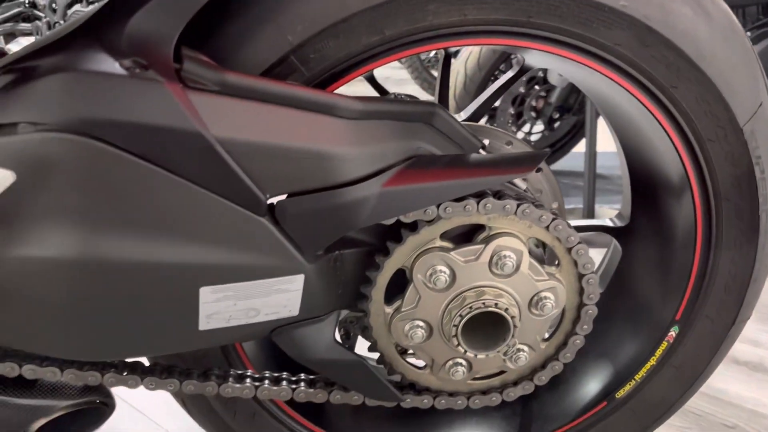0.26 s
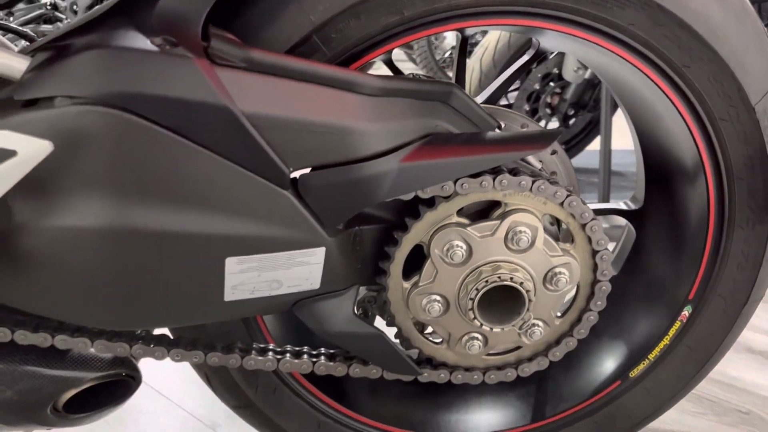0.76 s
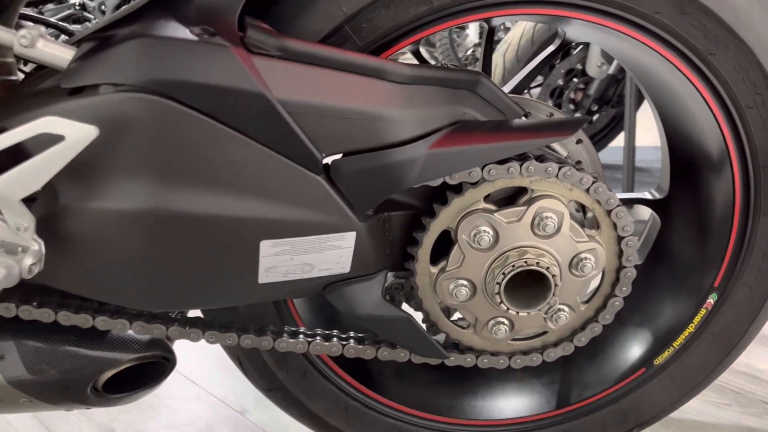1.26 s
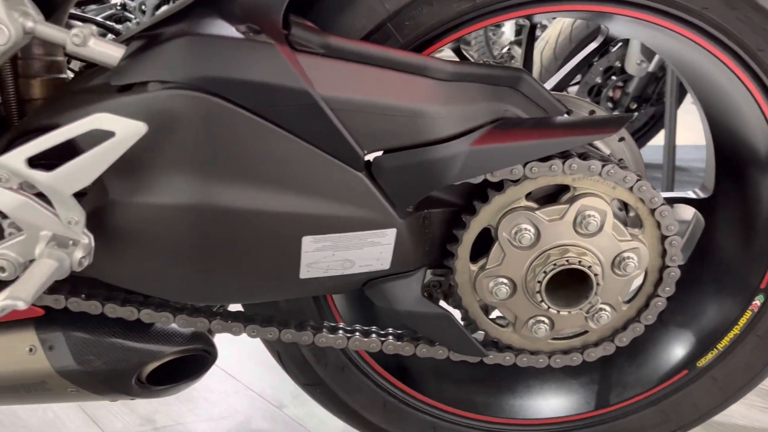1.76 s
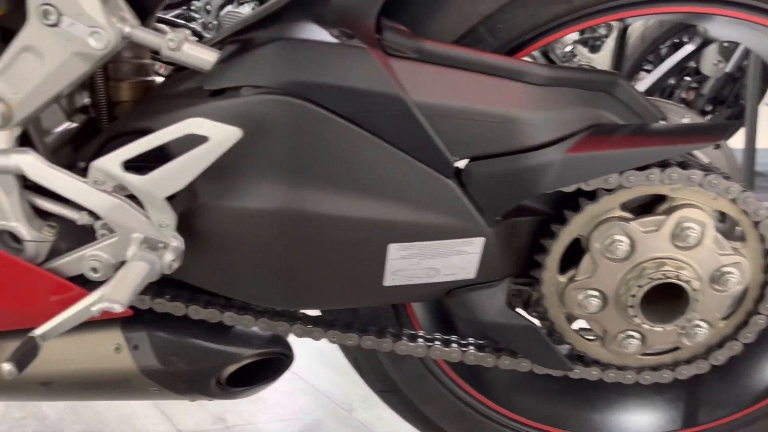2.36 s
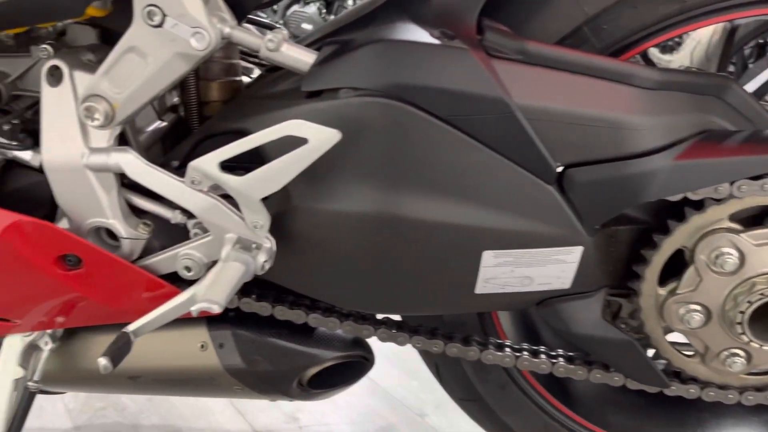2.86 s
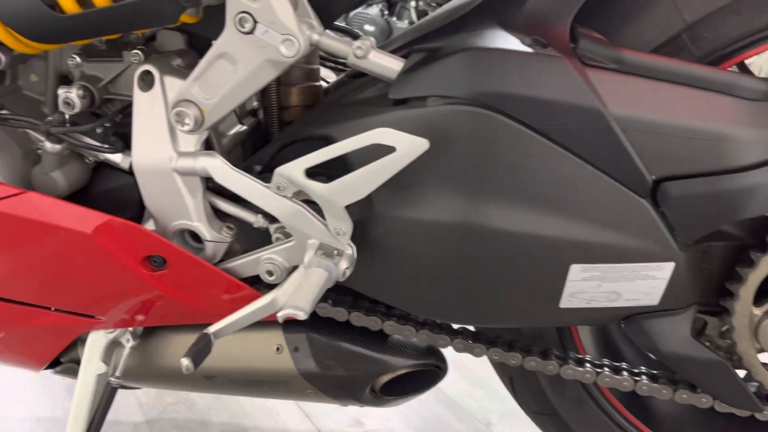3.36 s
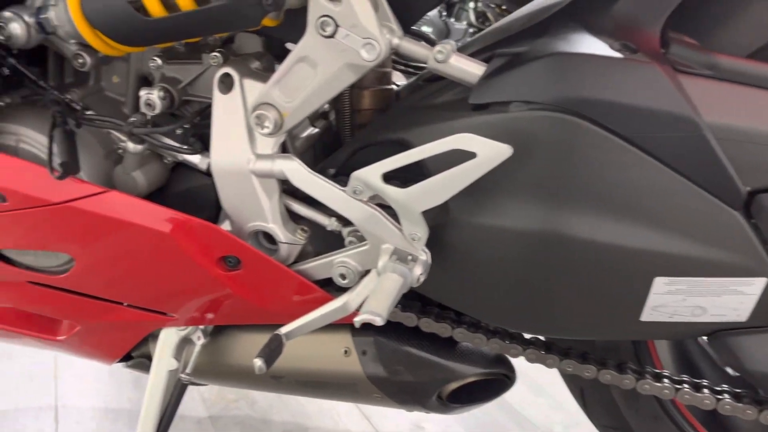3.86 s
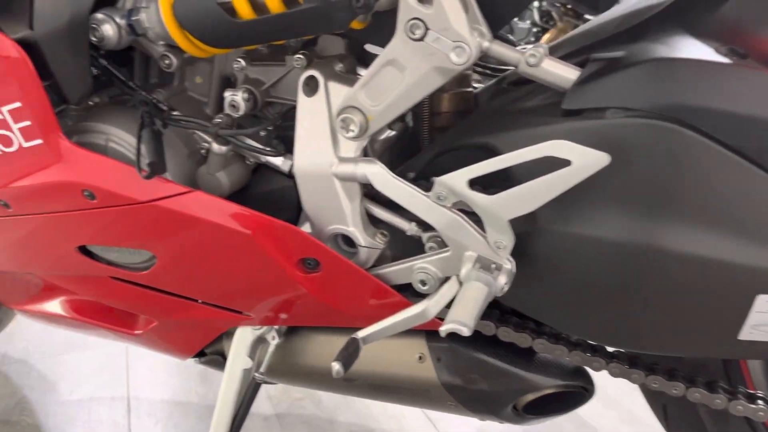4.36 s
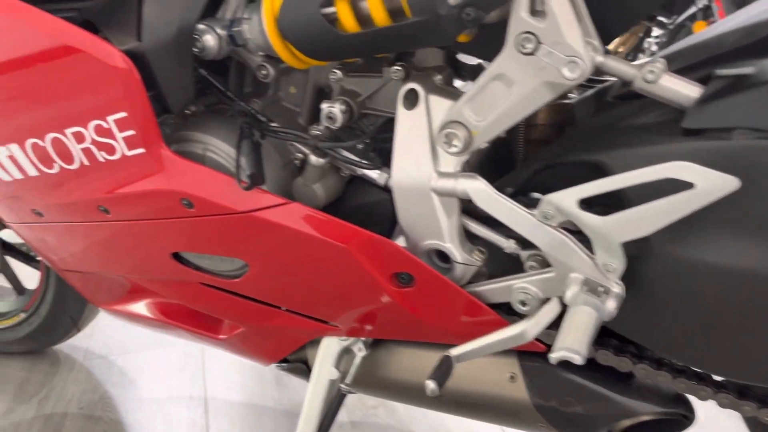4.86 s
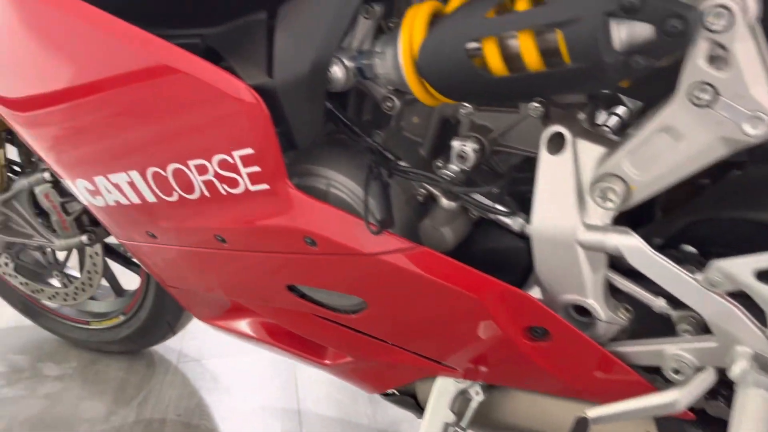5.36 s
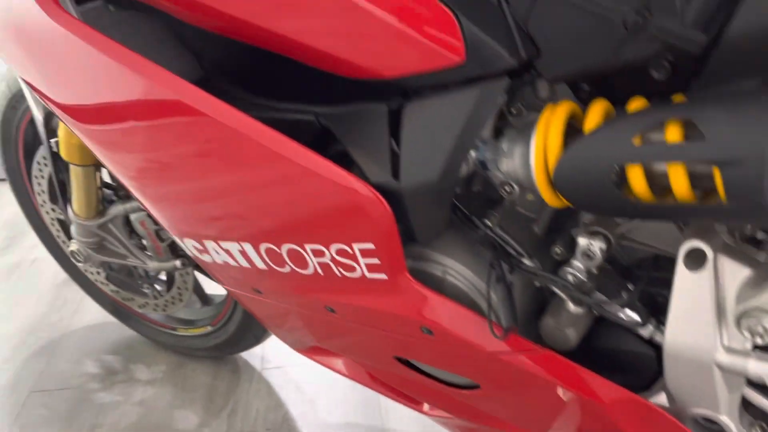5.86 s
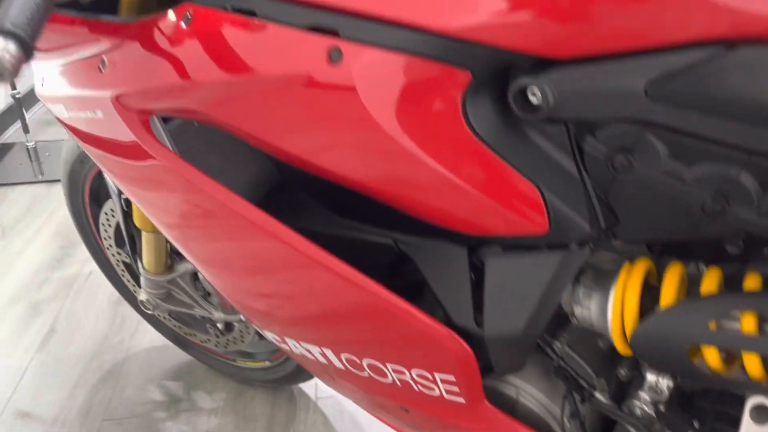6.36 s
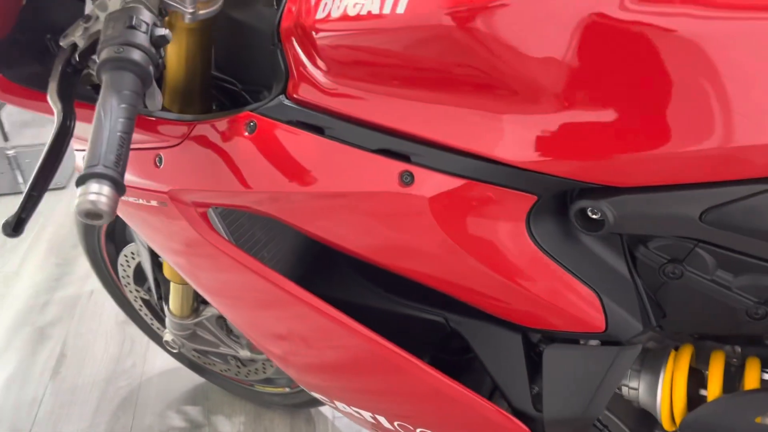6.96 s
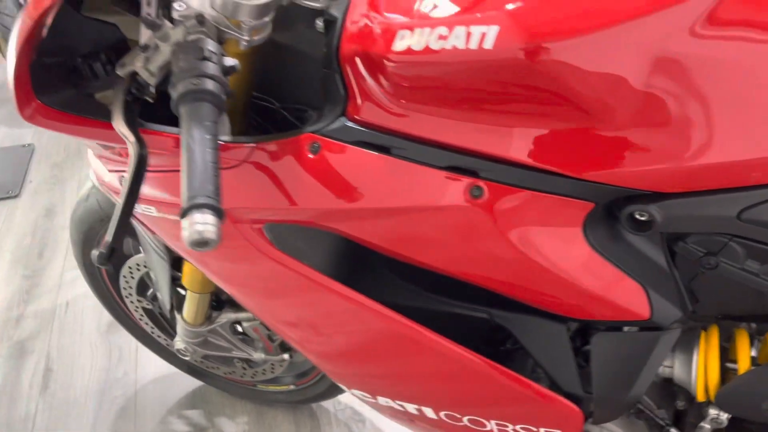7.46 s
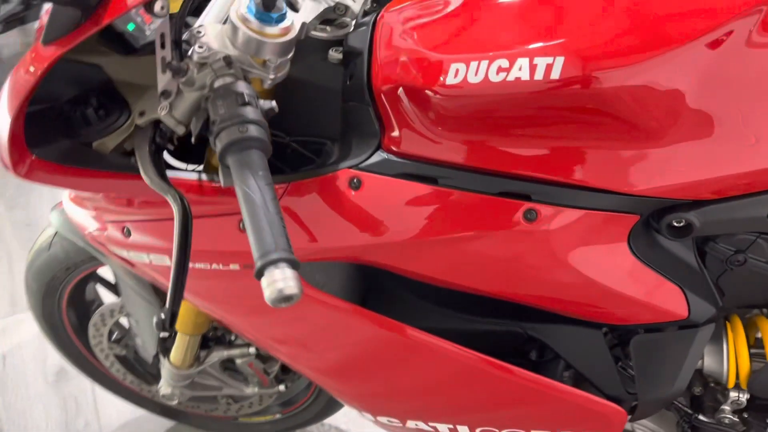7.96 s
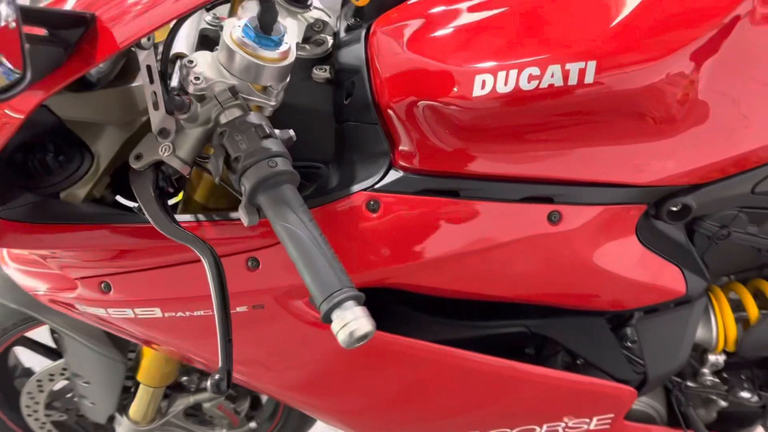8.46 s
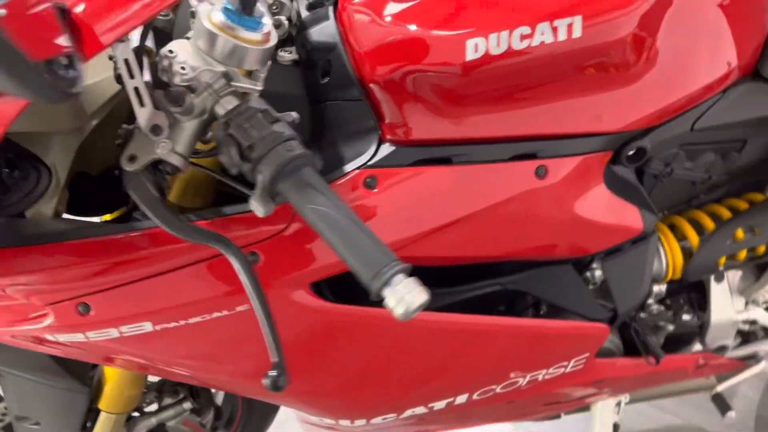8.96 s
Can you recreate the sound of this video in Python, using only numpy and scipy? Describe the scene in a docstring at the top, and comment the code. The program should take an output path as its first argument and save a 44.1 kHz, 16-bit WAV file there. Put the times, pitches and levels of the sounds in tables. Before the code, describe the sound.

Close, loud and bassy motorcycle idle, running throughout without revving. One cylinder fires steadily while the other catches irregularly, making a loping, stumbling beat. Case knocks and light valve ticks sit in continuous mechanical rattle. As the phone microphone travels forward along the machine, exhaust bark and rear beats weaken, the pulse slows slightly, and hall reverberation increases around it.

```python
"""Hard-floored hall: a big two-cylinder motorcycle idles unevenly; a phone moves from exhaust to bars.
Front cylinder fires almost every cycle, rear often misses; each gas puff rings exhaust modes and rasps.
Valve gear: noise swells at knocks and ticks over a clatter bed; knocks also ring the cases.
A deep tone follows the crank, uneven low noise rumbles, and the hall answers the exhaust."""
import sys
import numpy as np
from scipy import signal
from scipy.io import wavfile
from scipy.ndimage import uniform_filter1d

SR = 44100
rng = np.random.default_rng(int(sys.argv[2]) if len(sys.argv) > 2 else 0)


def dump_mix(stems):
    """Bounce the given channels to the path in sys.argv[1] as a 16-bit WAV at rate SR."""
    frames = np.atleast_2d(stems).T  # one column per channel
    limited = np.clip(frames, -1, 1)  # hard clip at full scale
    pcm = np.round(limited * 32767).astype(np.int16)
    wavfile.write(sys.argv[1], SR, pcm)


N = 406161
TIME_S = np.arange(N) / SR
LEAD_SAMPLES = SR // 10

# Idle hunts and slows: [time_s, engine_cycles_done]
CRANK = [(-0.0268, 0), (0.1048, 2), (0.1742, 3), (0.3637, 6), (0.7659, 12), (1.145, 18), (1.9886, 31),
         (2.7429, 42), (3.2802, 50), (3.7638, 57), (4.1039, 62), (4.2500, 64), (4.4592, 67), (4.8304, 72),
         (5.378, 80), (5.526, 82), (5.7244, 85), (5.9309, 88), (6.0626, 90), (6.4065, 95), (7.0438, 104),
         (7.183, 106), (7.2582, 107), (7.3907, 109), (7.8849, 116), (8.3875, 123), (8.4643, 124),
         (9.1678, 134), (9.238, 135)]
# Path from exhaust to bars: [time_s, share_of_way]
WALK = [(5, 0.18), (8, 0.92)]
# Front cylinder: [time_s, boom_rel_db, bark_rel_db]
FRONT = [(0, 2, 1), (1.7, 3.5, -0.5), (2.6, 1.5, 2.5), (3.8, 2, 1), (4.7, 0.5, 1.5), (5.8, 0, 1.5),
         (6.4, -2.5, -2.5), (7, -1.5, -5), (7.7, -2, -8.5), (8.3, -2, -9), (8.75, -7, -4.5), (8.9, -2, 0),
         (9.2, -6.5, -1.5)]
# Front firings that stray from the trend, mostly weaker, many just after a rear one:
# [time_s, boom_change_db, bark_change_db]
STRAY = [(-0.03, 3.5, -31), (0.04, -21, -3), (0.17, -4, -32), (0.76, -20, -3), (0.89, -18, -3.5),
         (1.01, -6, -3), (1.15, -17, -10), (1.28, -1, -6.5), (1.41, -4, -29), (1.54, -3.5, -8),
         (1.67, -5, -31), (1.8, -2.5, -8), (1.92, -8, -1), (2.06, -9.5, -31), (2.33, -9, -27),
         (2.47, -22, -5.5), (2.61, -5, -2), (2.74, -1, -32), (3.21, -8, 2.5), (3.63, -9, -1),
         (3.76, -0.5, -11), (3.83, -2, 1.5), (4.18, -1.5, 0), (5.17, -2.5, 3.5), (5.45, -3, 3.5),
         (5.79, -5, 4.5), (6.0, -1, 2.5), (6.2, -26, 2.5), (6.34, -8, -4), (6.41, -1, -1), (6.9, -5, -13),
         (6.97, -1, -5), (7.26, -1, -7), (8.39, -5, -5), (8.53, -9, -4), (8.67, -6, -7), (8.81, -24, -13),
         (8.96, -5, -4)]
# Rear cylinder catches: [time_s, level_rel_db]
REAR = [(0.013, 3), (0.1426, 3.5), (0.2119, -3.5), (0.2772, -11), (0.339, -4), (0.4719, 1.5), (0.6051, 3),
        (0.7413, 1.5), (0.8689, 1.5), (0.9892, 4.5), (1.1193, 2.5), (1.2494, 2), (1.3803, 4.5),
        (1.4434, -6), (1.5075, 0.5), (1.6409, 3), (1.768, 2.5), (1.8992, -0.5), (2.0364, -2.2),
        (2.1743, -1.5), (2.3078, 1), (2.4334, 1), (2.581, 2.5), (2.7183, 2), (2.7835, -5), (2.851, -1),
        (2.9177, -3.5), (3.0567, -2), (3.1876, 2.0), (3.256, -10.0), (3.325, 0.5), (3.4608, 0.5),
        (3.6045, 1), (3.735, -16), (3.8131, 2.5), (4.0111, 0.3), (4.2216, 2), (4.3622, 0), (4.6535, -15),
        (4.7265, -23), (4.8005, 0.5), (4.9404, 3), (5.0084, -6.5), (5.1494, -1.5), (5.3588, -2), (5.568, 1),
        (5.7674, 2.5), (5.9717, 0), (6.0968, -10), (6.18, -1.5), (6.3797, -3), (6.5952, -6.5),
        (6.7334, -16), (7.0181, -9.5), (7.1575, -6.5), (7.4341, -10), (7.6503, -11), (7.7823, -14),
        (7.9295, -11.5), (8.2882, -10.5), (8.4372, -15.0), (8.5028, -12), (8.8595, -10.5), (8.9977, -9.5),
        (9.0683, -12), (9.1417, -23)]
# Front firing that follows a rear one: [boom_change_db, bark_change_db]
AFTER_REAR_DB = (-.5, 1)
# Exhaust modes: [pitch_hz, t60_s, front_header_gain, rear_header_gain, change_at_bars_db]
PIPE = [(49.6, 0.42, 0.1039, 0.14, 5), (57.1, 0.096, 0.13, -0.97, -17), (72.3, 0.036, -1.6, -0.2, -6),
        (119.8, 0.13, 2, 0.37, -10), (133.5, 0.16, 2.5, 3, 1.5), (136.96, 0.13, -3.5, -2.5, -0.04),
        (168, 0.29, 0.195, 0.19, 1), (239.8, 0.045, -0.54, -2, 8), (292.2, 0.042, -4.5, 3.5, 5.0),
        (289.7, 0.075, 3, 0.97, 6.5), (303, 0.092, 1.79, -1.44, 3), (363.4, 0.062, 0.73, -0.2, 2.5),
        (414, 0.078, 0.15, -0.6, -7), (503, 0.0075, -0.6, -1.3, 0.5)]
# Puff rise time: [front_header_s, rear_header_s]
PUFF_RISE_S = (.0017, .0017)
# Gas rush at the outlet: [freq_hz, density_rel_db_per_hz]
RASP = [(200, -45), (330, 0.5), (420, 0), (470, -6.5), (560, -9), (750, -18), (1200, -56)]
# Rush dulls away from the outlet: [time_s, level_rel_db, change_above_450hz_db]
RASP_HEARD = [(0, -23.5, -4), (1, -24.5, -2), (2, -25, 1), (3, -27.5, -15), (4.5, -27, -19),
              (6, -33.5, -11.5), (7, -19.5, -9.5), (8, -19.5, -7), (9.21, -27.5, -11)]
# Third order of the engine cycle, wandering: [time_s, level_rel_db]
THROB = [(0, -11), (.3, -26), (.95, -20), (1.7, -18.5), (2.15, -22), (2.7, -20), (3.2, -19), (4.5, -28),
         (5.25, -22), (5.9, -35), (6.1, -23), (7.5, -34), (8.1, -26), (8.8, -17.5), (9.1, -22)]
# Bed levels and stereo: [time_s, clatter_rel_db, fizz_rel_db, rumble_rel_db,
# boom_left_over_right_db, bark_left_over_right_db]
BED = [(0, -33, -59.5, -21, 0, 10), (1.5, -34, -60.5, -19.5, 0.5, 8), (3.3, -35, -60.5, -23, -0.5, 6.5),
       (4.6, -35.5, -62.5, -21.5, 1.5, 4), (5.7, -35.5, -61, -24, -2, 2.5), (6.1, -35.5, -60, -26, -0.5, 2),
       (6.8, -37.5, -62, -22.5, -1, 0), (7.9, -38, -62.5, -27.5, -2.5, 6.5),
       (8.6, -38.5, -63.5, -27.5, 1, 4.5), (9.21, -38.5, -64, -25.5, 0, 2)]
# Clatter near the exhaust, sum of the ports: [freq_hz, density_rel_db_per_hz]
CLATTER_EXHAUST = [(280, -31), (480, -7.5), (805, -4.5), (890, -10.5), (1600, -10), (2610, -8), (3530, -13),
                   (4190, -12.5), (5660, -19.5), (7230, -27.5), (8220, -45.5), (9360, -27.5), (11900, -25),
                   (13800, -31.5), (14800, -43.5)]
# Clatter near the bars: [freq_hz, density_rel_db_per_hz]
CLATTER_BARS = [(330, -31), (560, -3.5), (688, -3.5), (956, 0.5), (1590, -6.5), (1770, -3), (1920, -5.5),
                (2980, -7), (7460, -26.5), (8440, -54), (9290, -31.5), (12600, -26), (13800, -40.5),
                (14800, -54)]
# Clatter rings that shift as the phone moves: [time_s, low_hz, low_lift_db, mid_hz, mid_lift_db,
# high_hz, high_lift_db]
RINGS = [(0, 750, 1.2, 1890, 3.2, 2660, 4.4), (2.5, 750, 4.4, 1890, 3.2, 2570, 1.6),
         (4.7, 715, 7.5, 1900, 5, 2560, 0.5), (5.9, 780, 4.9, 1940, 3.7, 2550, 1.3),
         (6.3, 820, 1.1, 1780, 9.9, 2470, 1.3), (7, 824, 4.3, 1810, 6.3, 2600, 1.4),
         (8.3, 833, 1.9, 1770, 3.3, 2560, 1.3), (9.21, 846, 4.5, 1805, 8, 2530, 1.8)]
# Gaussian widths of those rings: [low_hz, mid_hz, high_hz]
RING_WIDTHS_HZ = (35, 79, 200)
# Struck cases: [pitch_hz, level_re_knock_db, t60_s]
CASES = [(750, -3.5, 0.02), (1013, -10, .04), (1207, -3, 0.033), (1763, -10.5, 0.13), (2010, -3.5, 0.054),
         (2560, -4, 0.023), (3310, -13.5, 0.024), (4320, -15, 0.012)]
# Louder knocks: [time_s, peak_rel_db]
LOUD_KNOCKS = [(0.0253, -23), (0.0932, -21.5), (0.1356, -27), (0.2269, -25), (1.8467, -28), (1.9799, -27),
               (2.3865, -24), (2.5277, -24.5), (2.6628, -25), (2.7282, -27), (2.7995, -25), (2.9337, -24.5),
               (3.0694, -25), (3.2006, -25), (3.3373, -24), (3.4042, -26), (3.4765, -26), (3.6127, -24.5),
               (3.682, -23), (3.9559, -24.5), (4.0228, -23.5), (4.377, -26.5), (4.4463, -25), (4.5196, -26),
               (4.6703, -25.5), (4.7411, -27.5), (4.8189, -25.5), (4.8853, -27), (4.9546, -23.5),
               (5.026, -26), (5.1622, -24), (5.2979, -28), (5.5807, -24), (5.7813, -25.5), (5.8476, -25),
               (5.9189, -31), (5.9858, -22), (6.118, -28.5), (6.2562, -28), (6.3959, -24.5),
               (6.8154, -26.5), (6.9581, -25.5), (7.0973, -27), (7.444, -26), (7.5877, -30), (8.4482, -28),
               (8.5949, -26.5), (8.7301, -29), (9.0838, -28), (9.1551, -27)]
# Louder ticks: [time_s, peak_rel_db]
LOUD_TICKS = [(0.1027, -41), (0.2982, -41), (0.3636, -39), (0.4284, -44), (0.4958, -40), (0.5616, -34),
              (0.63, -40), (0.6958, -36), (0.8255, -41), (0.9537, -38), (1.0201, -40), (1.0774, -41),
              (1.2096, -40), (1.3394, -37), (1.726, -35), (1.9889, -40), (2.1241, -43), (2.1929, -39),
              (2.2613, -40), (2.3271, -41), (2.394, -43), (2.604, -39), (2.808, -39), (2.8739, -45),
              (2.9412, -42), (3.0779, -39), (3.1428, -41), (3.2101, -38), (3.277, -45), (3.3473, -41),
              (3.5568, -40), (3.6237, -39), (3.8337, -39), (3.897, -41), (4.0332, -40), (4.1754, -42),
              (4.3874, -44), (4.5306, -44), (4.7531, -48), (4.8259, -43), (4.9656, -43), (5.0335, -38),
              (5.1033, -37), (5.1692, -38), (5.238, -45), (5.3068, -44), (5.451, -42), (5.5238, -37),
              (5.5902, -37), (5.654, -40), (5.7209, -42), (5.7678, -41), (5.7912, -35), (5.8586, -37),
              (5.9284, -45), (5.9983, -37), (6.13, -40), (6.1749, -41), (6.1978, -38), (6.2657, -41),
              (6.4073, -43), (6.546, -42), (6.6164, -42), (6.8294, -41), (6.9711, -46), (7.458, -43),
              (7.6006, -40), (7.7428, -43), (7.881, -40), (8.4627, -44)]
# Rumble spectrum: [freq_hz, density_rel_db_per_hz]
RUMBLE = [(25, -13.5), (45, 7), (60, 3), (100, 6), (128, 2.5), (146, 1), (165, -4), (200, -12), (280, -2.5),
          (400, -17), (520, -50)]
# Hall decay: [freq_hz, t60_s]
HALL = [(40, 0.98), (150, 0.6), (400, 0.89), (1000, 0.54)]
# Port difference against port sum: [freq_hz, level_db]
ACROSS = [(60, -18.5), (130, -17.5), (280, -4.5), (450, -11), (700, -2.5), (1000, -5), (1500, 7),
          (1750, -10), (2800, -5.5), (4000, -6.5), (5500, -4.5), (7000, -1), (8200, 23), (10000, 0.5),
          (12000, -28.5), (14000, 5.5)]
# Likeness of port difference and sum: [freq_hz, in_phase, in_quadrature]
LINK = [(280, 0.56, -0.42), (450, 0.21, -0.48), (700, 0.19, 0.46), (1020, 0.4, -0.035), (1520, -0.25, -0.0),
        (2000, 0.23, 0.39), (2800, 0.29, 0.6), (4000, 0.34, 0.28), (5500, 0.26, -0.25), (7000, 0.09, -0.51),
        (8200, 0.02, -0.05), (10000, -0.01, 0.44), (12000, -0.02, 0.08), (14000, -0.0, -0.14)]

BOOM_MODES = 7  # leading exhaust modes form the boom, the rest the bark
SPEED_JITTER_S, FIRING_SCATTER_DB = 0.00031, 0.5
THROB_ORDER = 3  # swings per engine cycle
# Relative levels; FIRED applies where the rear fires, BARS at the bars, CREST is peak over power level
KNOCK_REL_DB, KNOCK_FIRED_DB, KNOCK_BARS_DB = -34.5, 1.5, -1.5
KNOCK_SCATTER_DB, KNOCK_CREST_DB = 1.5, 5.5
TICK_REL_DB, TICK_BARS_DB, TICK_SCATTER_DB, TICK_CREST_DB = -52.5, -4.5, -1, 8.5
TREBLE_SPLIT_HZ = 8200
BAND_EDGE_HZ = 14960


def firing_times():
    """The front cylinder's turn comes at every whole engine cycle, slightly jittered."""
    time_s, cycles = np.transpose(CRANK)
    whole = np.arange(np.ceil(cycles[0]), cycles[-1])
    return np.interp(whole, cycles, time_s) + SPEED_JITTER_S * rng.standard_normal(len(whole))


def rear_fired(front_s):
    """For each cycle, how fully the rear cylinder fired against the front boom, 0-1."""
    rear_s, rear_db = np.transpose(REAR)
    fired = np.zeros(len(front_s))
    cycle = np.searchsorted(front_s, rear_s) - 1
    fired[cycle] = np.minimum(gain_of(rear_db - curve(FRONT, rear_s)), 1)
    return fired


def front_levels(front_s):
    """Boom and bark dB of each front firing: trend, scatter, rear aftermath and stray firings."""
    db = np.array([curve(FRONT, front_s), curve(FRONT, front_s, axis=2)])
    db += FIRING_SCATTER_DB * rng.standard_normal((len(front_s), 2)).T
    db[:, 1:] += np.outer(AFTER_REAR_DB, rear_fired(front_s)[:-1])
    stray = np.transpose(STRAY)
    nearest = abs(front_s - stray[0][:, None]).argmin(1)
    db[:, nearest] += stray[1:]
    return db


def exhaust(front_s, boom_db, bark_db):
    """Each puff of gas rings the pipe modes; low modes make the boom, high ones the bark."""
    t = np.arange(SR // 4) / SR
    boom_bark = np.zeros((2, N))
    puffs = [t[:1500] / rise_s * np.exp(-t[:1500] / rise_s) for rise_s in PUFF_RISE_S]
    rear_s, rear_db = np.transpose(REAR)
    for k, (hz, t60_s, front_gain, rear_gain, bars_db) in enumerate(PIPE):
        part = int(k >= BOOM_MODES)
        ring = decaying_sine(hz, t60_s, t)
        firings = [(front_s, (boom_db, bark_db)[part], front_gain), (rear_s, rear_db, rear_gain)]
        for puff, (at_s, db, header_gain) in zip(puffs, firings):
            gain = header_gain * gain_of(db + bars_db * curve(WALK, at_s))
            boom_bark[part] += strike(at_s, gain, signal.fftconvolve(ring, puff / puff.sum()))
    return boom_bark


def rasp(front_s, bark_db):
    """Turbulent gas rushes out for a moment with each firing: noise under a power envelope."""
    rear_s, rear_db = np.transpose(REAR)
    power = strike(front_s, gain_of(2 * bark_db), burst(0.0065, 0.11))
    power += strike(rear_s, gain_of(2 * (rear_db + 0.5)), burst(0.0062, 0.14))

    def colour_db(hz, t):
        return read(RASP, hz) + (hz > 450) * curve(RASP_HEARD, t, axis=2)

    rush = noise(colour_db, size=1024, patchy_db=2.0)
    return rush * gain_of(curve(RASP_HEARD, TIME_S)) * np.sqrt(abs(power))


def throb():
    """A deep sine locked to the crank, three swings to each engine cycle."""
    cycles = curve(CRANK, TIME_S)
    peak = np.sqrt(2) * gain_of(curve(THROB, TIME_S) - 4.5)
    return peak * np.sin(2 * np.pi * THROB_ORDER * cycles)


def knock_events(front_s, cycle_s, chance):
    """One knock late in each cycle, louder where the rear fires; listed loud ones replace theirs."""
    db = KNOCK_REL_DB + KNOCK_FIRED_DB * rear_fired(front_s)
    db += KNOCK_BARS_DB * curve(WALK, front_s) + KNOCK_SCATTER_DB * chance
    knock_s = front_s + 0.815 * cycle_s
    loud_s, loud_db = np.transpose(LOUD_KNOCKS)
    loud = np.searchsorted(front_s, loud_s) - 1
    db[loud] = loud_db - KNOCK_CREST_DB
    knock_s[loud] = loud_s
    return knock_s, db


def tick_power(front_s, cycle_s, chance):
    """Treble power of two ticks a cycle, the earlier one weaker, plus the listed loud ticks."""
    db = TICK_REL_DB + TICK_BARS_DB * curve(WALK, front_s) + TICK_SCATTER_DB * chance
    early_db = db - 9.0 + 3 * rng.standard_normal(len(front_s))
    loud_s, loud_db = np.transpose(LOUD_TICKS)
    power = strike(front_s + 0.95 * cycle_s, gain_of(2 * db), burst(0.0023, 0.14))
    power += strike(front_s + 0.27 * cycle_s, gain_of(2 * early_db), burst(0.0008, 0.063))
    return power + strike(loud_s, gain_of(2 * (loud_db - TICK_CREST_DB)), burst(0.0008, 0.08))


def clatter_noise():
    """Gear noise below and above the treble split, its colour moving from exhaust to bars."""
    def colour_db(hz, t):
        near = read(CLATTER_EXHAUST, hz)
        return near + curve(WALK, t) * (read(CLATTER_BARS, hz) - near)

    def low_db(hz, t):
        db = colour_db(hz, t) - 80 * (hz > TREBLE_SPLIT_HZ)
        for k, width_hz in enumerate(RING_WIDTHS_HZ):
            offset = (hz - curve(RINGS, t, 2 * k + 1)) / width_hz
            db = db + curve(RINGS, t, 2 * k + 2) * np.exp(-offset ** 2)
        return db

    def high_db(hz, t):
        return colour_db(hz, t) - 80 * (hz <= TREBLE_SPLIT_HZ)

    low = noise(low_db, size=1024, patchy_db=1.5)
    return low, noise(high_db, size=256, patchy_db=2.0)


def struck_cases(knock_s, knock_db):
    """Each knock rings every case mode with random delay, strength and sign."""
    t = np.arange(SR // 10) / SR
    blows = rng.standard_normal((len(knock_s), len(CASES), 2))
    out = np.zeros(N)
    for k, (hz, db, t60_s) in enumerate(CASES):
        at_s = knock_s + 0.0005 * abs(blows[:, k, 0])
        gain = gain_of(knock_db + db) * np.tanh(1.9 * blows[:, k, 1])
        out += strike(at_s, gain, decaying_sine(hz, t60_s, t))
    return out


def valve_gear(front_s):
    """Clatter swells at each knock, which also rings the cases; the treble jumps at the ticks."""
    chance = np.clip(rng.standard_normal((len(front_s), 2)).T, -2, 1)
    cycle_s = np.diff(front_s, append=front_s[-1] + 0.07)
    knock_s, knock_db = knock_events(front_s, cycle_s, chance[0])
    low, high = clatter_noise()
    knocks = strike(knock_s, gain_of(2 * knock_db), burst(0.0011, 0.15))
    rattle_gain = gain_of(1.8 * rng.standard_normal(900))
    rattle = strike(rng.uniform(0, N / SR, 900), rattle_gain, burst(0.0004, 0.027))
    ticks = tick_power(front_s, cycle_s, chance[1])
    bed = gain_of(curve(BED, TIME_S) + 1.0) ** 2 * (0.62 + 0.38 * rattle)
    fizz = gain_of(curve(BED, TIME_S, axis=2) + 2.5) ** 2
    clatter = low * np.sqrt(abs(bed + 0.64 * knocks)) + high * np.sqrt(abs(fizz + 1.5 * ticks))
    return clatter + struck_cases(knock_s, knock_db) * gain_of([[1.5], [-1.5]])


def rumble():
    """A low uneven drone of noise that fills the gaps between firings."""
    def colour_db(hz, t):
        return read(RUMBLE, hz) - 60 * (hz > 600) + 0 * t

    return noise(colour_db, size=4096, patchy_db=3.0) * gain_of(curve(BED, TIME_S, axis=3) - 1.5)


def hall(x):
    """Sparse taps of random sign, each band dying at its own speed."""
    taps = np.zeros((2, SR))
    at = np.arange(700, SR - 20, 20) + rng.integers(0, 20, (2, (SR - 701) // 20))
    np.put_along_axis(taps, at, rng.choice([-1., 1.], at.shape), 1)
    taps[1] = 0.86 * taps[0] + 0.25 * taps[1]  # both ports hear almost the same taps
    hz, t, spectrum = signal.stft(taps, SR, nperseg=1024)
    decay = gain_of(-60 * t / read(HALL, hz)[:, None])
    tail = signal.istft(spectrum * decay, SR, nperseg=1024)[1]
    return signal.fftconvolve(x[None], tail / np.linalg.norm(tail[0]), axes=1)[:, :N]


def noise(sum_db, size, patchy_db):
    """Noise on a port pair: the sum follows sum_db(hz, t), the difference is partly tied to it."""
    hop = size // 4
    frames, hz = N // hop + 5, np.fft.rfftfreq(size, 1 / SR)
    a, b, c, d, patches = rng.standard_normal((frames, len(hz), 5)).T
    patches = evened(uniform_filter1d(uniform_filter1d(patches, 6, 0), 8, 1))
    mid = a + 1j * b
    link = (read(LINK, hz) + 1j * read(LINK, hz, axis=2))[:, None]
    side = link * mid + np.sqrt(np.clip(1 - abs(link) ** 2, 0, 1)) * (c + 1j * d)
    side = side * gain_of(read(ACROSS, hz))[:, None]
    colour = gain_of(sum_db(hz[:, None], np.arange(frames) * hop / SR) + patchy_db * patches)
    spectra = np.array([mid + side, mid - side]) * colour
    pair = signal.istft(spectra, nperseg=size, noverlap=size - hop)[1][:, :N]
    return pair / np.sqrt(np.mean(pair.mean(0) ** 2))


def strike(at_s, gain, shape):
    """Plays one shape at every time at_s."""
    train = np.zeros(N + 2 * LEAD_SAMPLES)
    np.add.at(train, np.round(at_s * SR).astype(int) + LEAD_SAMPLES, gain)
    return signal.oaconvolve(train, shape)[LEAD_SAMPLES:LEAD_SAMPLES + N]


def burst(rise_s, t60_s):
    """Power of a quick rise and an exponential decay."""
    t = np.arange(SR // 10) / SR
    return ((1 - np.exp(-t / rise_s)) * gain_of(-60 * t / t60_s)) ** 2


def decaying_sine(hz, t60_s, t):
    """A struck mode: a sine that falls 60 dB in t60_s."""
    return gain_of(-60 * t / t60_s) * np.sin(2 * np.pi * hz * t)


def gain_of(db):
    """Decibels to amplitude."""
    return 10 ** (np.asarray(db) / 20)


def evened(x):
    """Scales to rms 1."""
    return x / np.sqrt(np.mean(x ** 2) + 1e-20)


def read(points, hz, axis=1):
    """A spectrum column, straight on a log-frequency axis."""
    columns = np.transpose(points)
    return np.interp(np.log(hz + 1), np.log(columns[0] + 1), columns[axis])


def curve(rows, t, axis=1):
    """A curve column at the times t."""
    columns = np.transpose(rows)
    return np.interp(t, columns[0], columns[axis])


def scene():
    """Exhaust with its hall and rasp, throb, rumble and valve gear."""
    front_s = firing_times()
    boom_db, bark_db = front_levels(front_s)
    boom, bark = exhaust(front_s, boom_db, bark_db)
    sides = np.array([[0.5], [-0.5]])
    skew_s = 0.00012  # boom: left port early, right port late, each by this much
    boom_pair = boom * gain_of(sides * curve(BED, TIME_S, axis=4))
    boom_pair = boom_pair + 2 * sides * skew_s * SR * np.gradient(boom)
    bark_pair = bark * gain_of(sides * curve(BED, TIME_S, axis=5))
    wet = gain_of(-13.5 + 6.0 * curve(WALK, TIME_S)) * hall(boom + bark)
    engine = boom_pair + bark_pair + wet + throb()
    return engine + rumble() + rasp(front_s, bark_db) + valve_gear(front_s)


def record(dry):
    """Bass roll-off, a narrow dip near 8 kHz in the sum of the ports, soft clipping and the band limit."""
    x = signal.sosfilt(signal.butter(6, 38, "high", fs=SR, output="sos"), dry)
    dip = signal.firwin(401, [7700, 9000], pass_zero=False, fs=SR)
    x = x - 0.75 * signal.oaconvolve(x.mean(0), dip, "same")
    x = x / (1 + abs(x / 0.95) ** 6) ** (1 / 6)
    band = signal.firwin(511, BAND_EDGE_HZ, window=("kaiser", 9), fs=SR)
    return signal.oaconvolve(x, band[None], "same", axes=1)


dry = scene()
out = record(dry)
dump_mix(out)
```